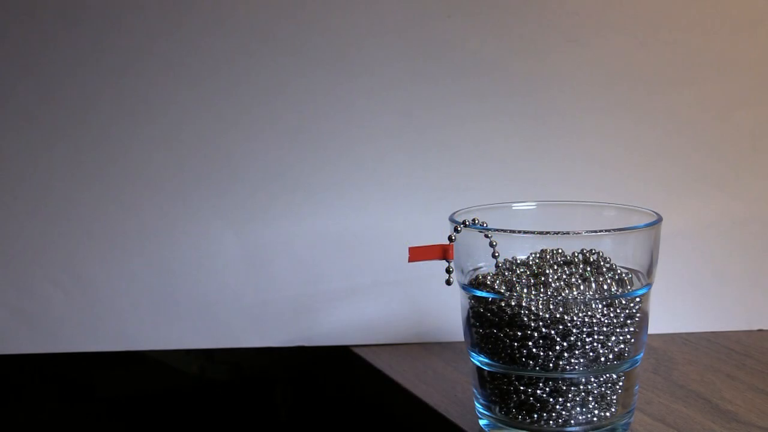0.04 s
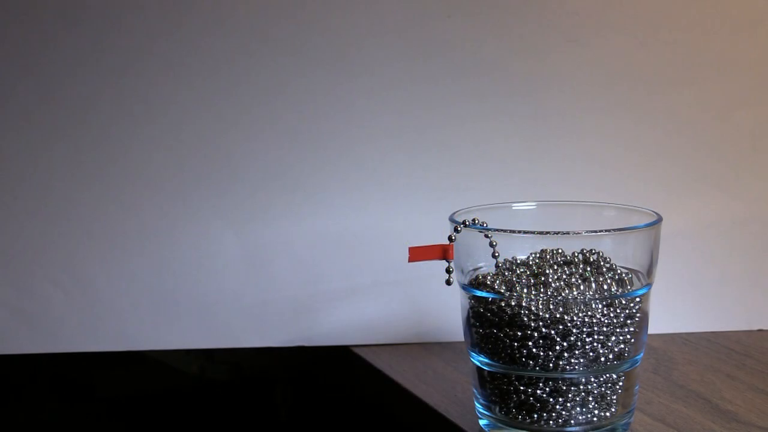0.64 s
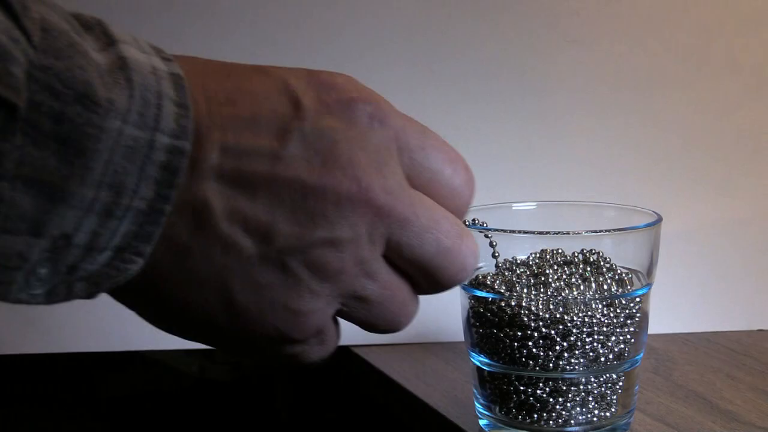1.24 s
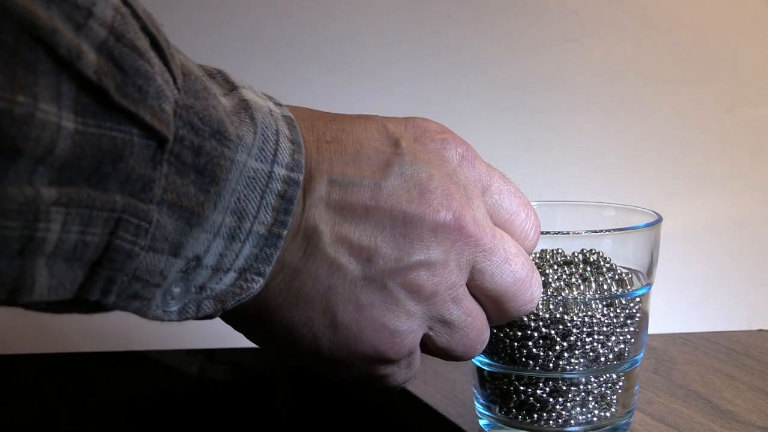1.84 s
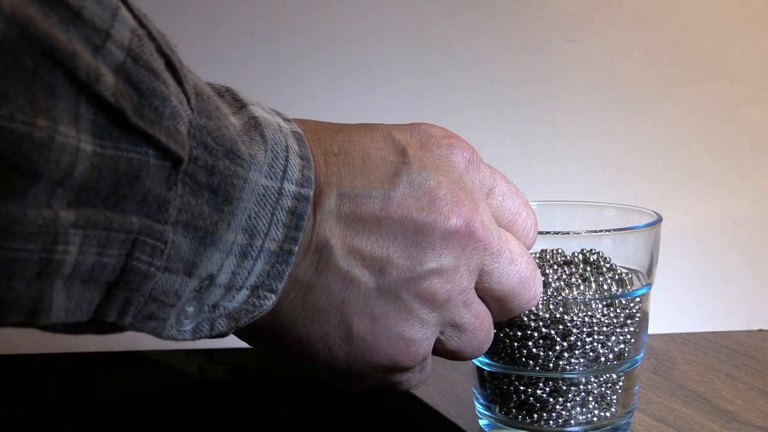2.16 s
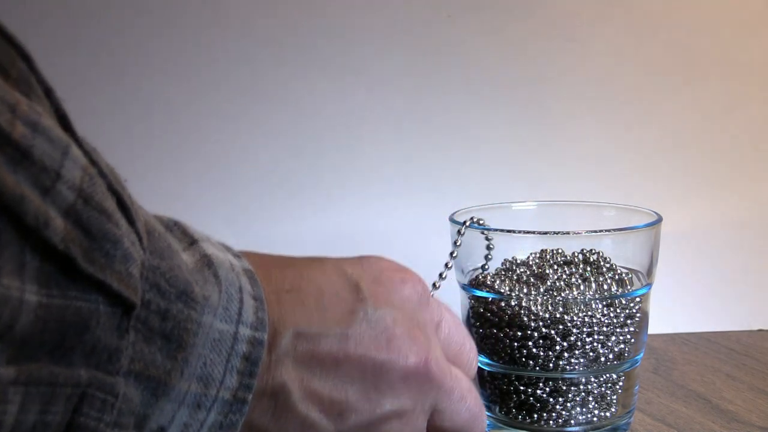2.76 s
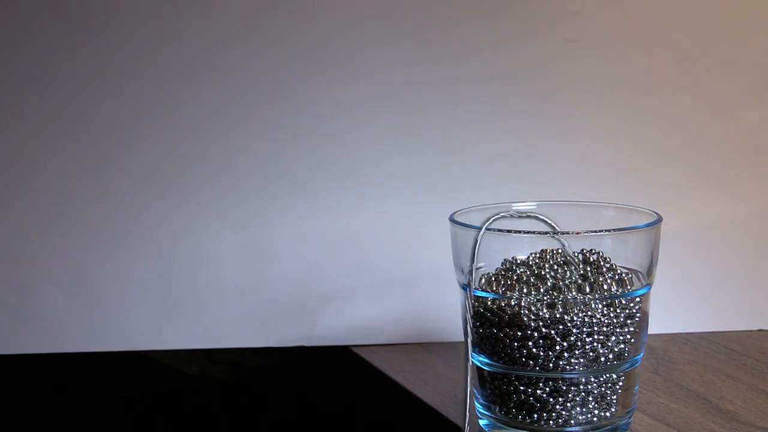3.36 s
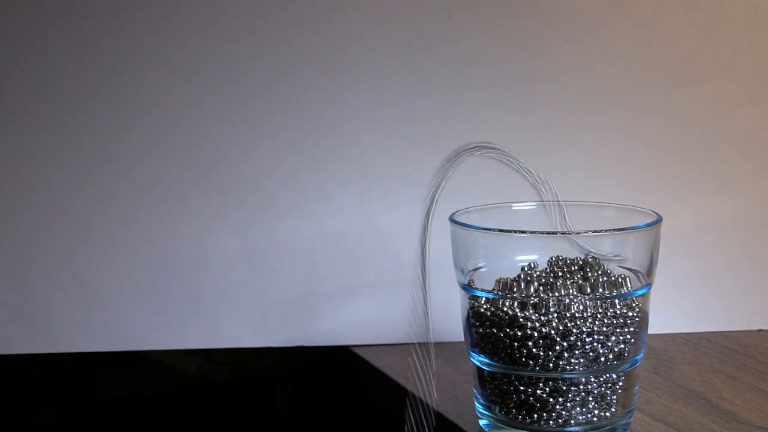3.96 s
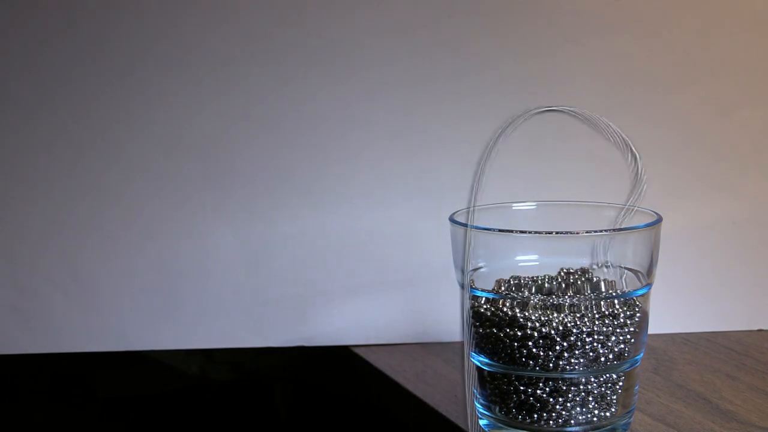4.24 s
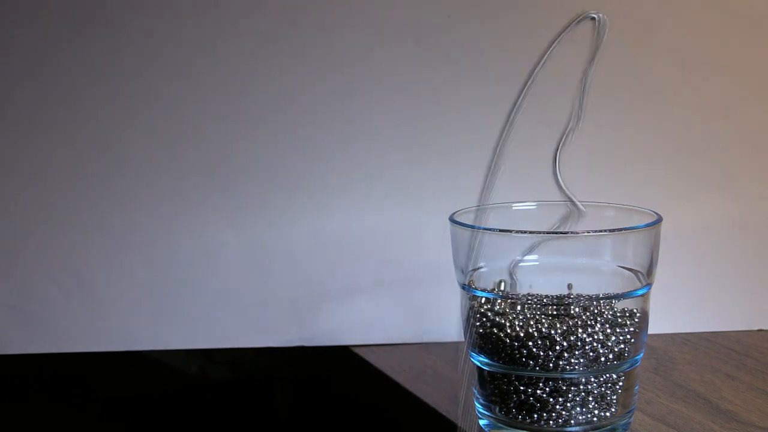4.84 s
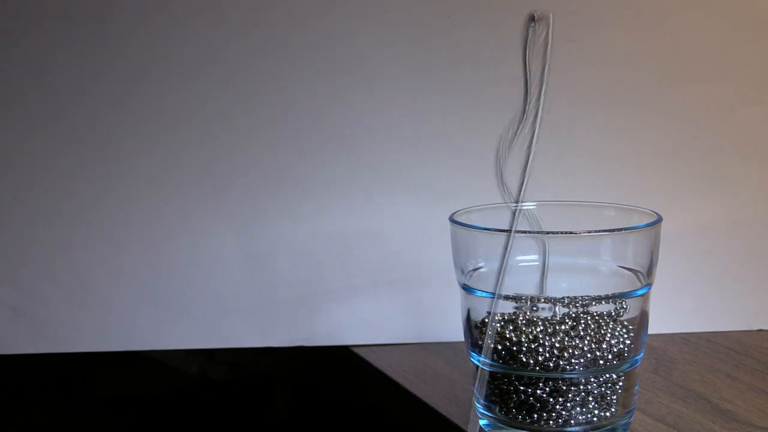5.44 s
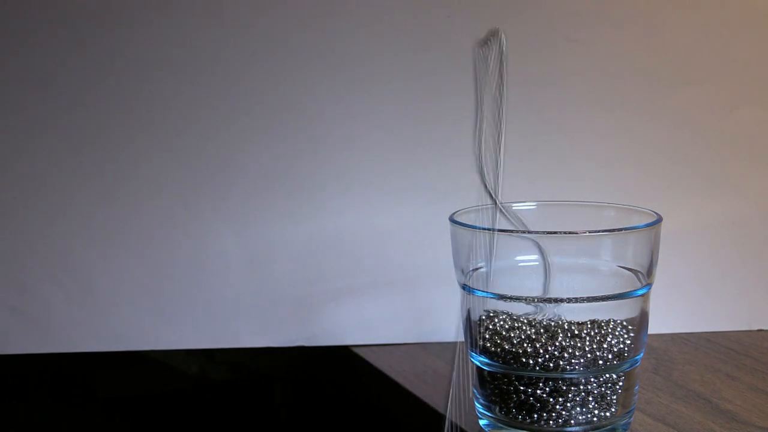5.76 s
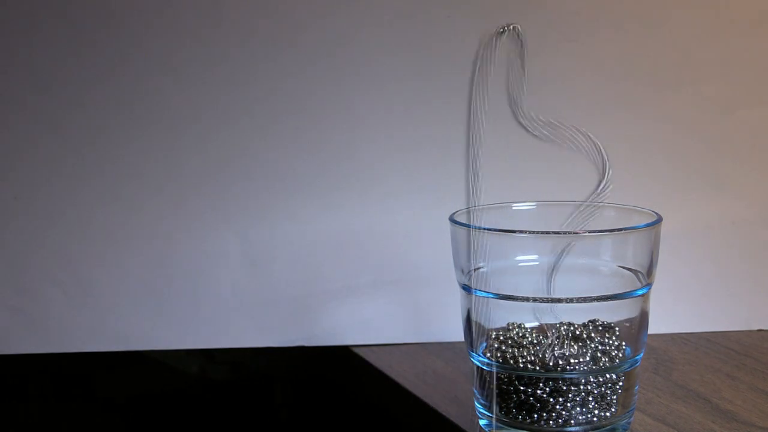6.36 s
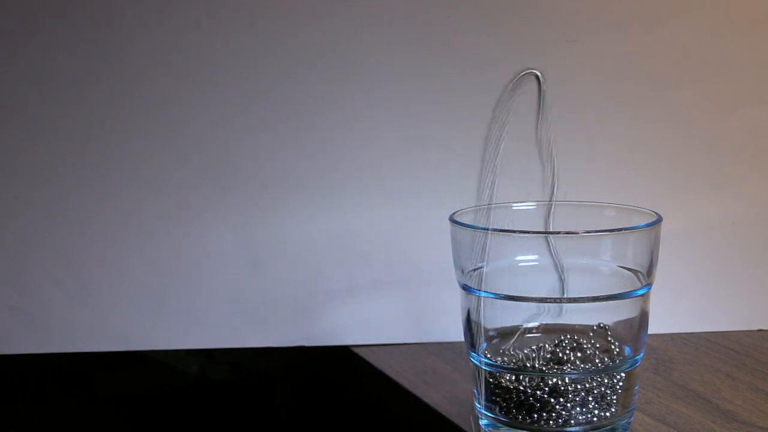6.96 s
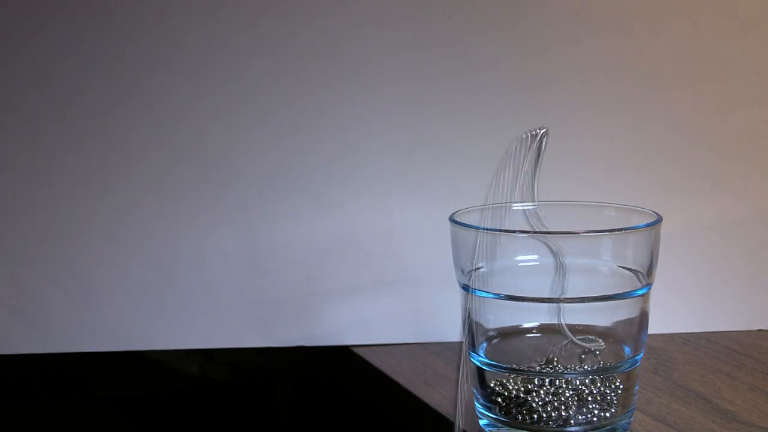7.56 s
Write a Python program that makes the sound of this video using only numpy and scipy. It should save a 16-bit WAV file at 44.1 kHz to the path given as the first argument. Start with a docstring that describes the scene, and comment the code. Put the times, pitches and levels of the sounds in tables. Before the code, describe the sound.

For the first two seconds there is only the faint hiss and hum of a small room, a few soft swishes, and a hand gently bumping the table at about 1.6 seconds. From 2.3 seconds a metal bead chain is drawn over the rim of a nearby drinking glass: sharp little ticks, a fine jingle and brief glassy rings, growing louder, with light knocks on the table edge and a low rumble from the unwinding pile. At about 3.9 seconds the running chain starts hitting a hard surface below and becomes a loud, bright clatter. It comes in uneven surges with sharp slaps, strongest from about 4 to 6.2 seconds, with occasional clinks from the glass. After about 6.7 seconds the surges and slaps are weaker, with thin, high ringing, and the rattle dies down at around 7.6 seconds.

```python
"""A metal bead chain siphons itself out of a drinking glass in a small, quiet room.
First come faint air, hum and swishes, and a hand bumps the table. From 2.3 s the chain is drawn over
the rim: beads tick and jingle, the glass rings, the unwinding pile rumbles through the table and beads
knock on its edge. From about 3.9 s the chain, let go and running in an arch, clatters on a hard
surface below in surges and slaps, which grow weaker after about 6.7 s."""
import sys
import numpy as np
from scipy import signal
from scipy.fft import rfft, irfft, next_fast_len
from scipy.io import wavfile
from scipy.ndimage import uniform_filter1d

SR = 44100
rng = np.random.default_rng(int(sys.argv[2]) if len(sys.argv) > 2 else 0)


def wav_record(signal):
    """Record a signal, one row per channel, as 16-bit PCM in the file named by sys.argv[1]."""
    frames = np.transpose(np.atleast_2d(signal))
    bounded = np.clip(frames, -1, 1)
    # unit amplitude maps onto the largest positive 16-bit level
    quanta = np.round(bounded * 32767).astype(np.int16)
    wavfile.write(sys.argv[1], SR, quanta)


N = 340011
TIME = np.arange(N) / SR
FFT_SIZE = next_fast_len(N + SR, True)
HZ = np.fft.rfftfreq(FFT_SIZE, 1 / SR)


def amp(db):
    """Turns decibels into a number to multiply a sound by."""
    return 10 ** (np.asarray(db) / 20)


def unit_rms(x):
    """Scales a signal so that its average strength (rms) is one."""
    return x / np.sqrt(np.mean(x ** 2) + 1e-20)


def curve_at(points, hz):
    """Joins (pitch, value) points with lines on a log pitch scale and looks up hz."""
    pitches, values = np.transpose(points)
    return np.interp(np.log(hz + 1), np.log(pitches + 1), values)


def follow(points):
    """Turns (time, level) points into a gain for every sample, silent before the first."""
    times, levels_db = np.transpose(points)
    return amp(np.interp(TIME, times, levels_db)) * (TIME >= times[0])


def swell(peak_s, half_s, t=TIME):
    """A smooth, bell-shaped rise and fall."""
    return np.exp(-.5 * ((t - peak_s) / half_s) ** 2)


def fading_tone(hz, t60, t):
    """One resonance: a pure tone that fades by 60 dB in its ring time, t60 seconds."""
    return np.sin(2 * np.pi * hz * t) * np.exp(-np.log(1000) * t / t60)


def add(mix, s, sound):
    """Adds a sound to the mix at s seconds."""
    part = mix[max(round(s * SR), 0):][:len(sound)]
    part += sound[:len(part)]


def causal(gain):
    """A filter spectrum shaped like gain that rings after a click, never before (minimum phase)."""
    cepstrum = irfft(np.log(np.maximum(gain / gain.max(), 1e-5)))
    half = len(cepstrum) // 2
    cepstrum[1:half] *= 2
    cepstrum[half + 1:] = 0
    response = np.exp(rfft(cepstrum))
    return response / np.sqrt(np.mean(abs(response) ** 2))


def drift(per_s):
    """A random wobble that changes course about per_s times a second."""
    knots = np.arange(0, TIME[-1] + 1, 1 / per_s)
    return unit_rms(np.interp(TIME, knots, rng.standard_normal(4096)[:len(knots)]))


def patter(per_s, spread_db, size=N):
    """Tiny hits at random times; most are small, a few large."""
    chance, force, side = rng.random((3, size))
    strength = amp(spread_db * np.minimum(-np.log(1 - force), 4))
    return (chance < per_s / SR) * strength * np.sign(side - .5)


def stereo_pair(a, b, likeness):
    """Makes left and right from two noises; a likeness of 1 makes both sides the same."""
    return np.array([a, likeness * a + np.sqrt(1 - likeness ** 2) * b])


def noise(colour, likeness):
    """Stereo noise whose colour (its balance of low and high) follows (pitch, level) points."""
    a, b = rfft(rng.standard_normal((2, FFT_SIZE)))
    return unit_rms(irfft(stereo_pair(a, b, likeness) * amp(curve_at(colour, HZ)))[:, :N])


def hum():
    """Two faint tones that waver slightly."""
    # (pitch [Hz], level [dB])
    tones = [(301, -68.5), (1238, -76.5)]
    out = 0
    for hz, db in tones:
        phase = 2 * np.pi * (hz * TIME + rng.random()) + .5 * drift(5.17)
        out += amp(db) * np.sqrt(2) * np.sin(phase)
    return out


def room_air(level_db=-58):
    """The soft, steady hiss of the room."""
    # colour of the air (pitch [Hz], level [dB])
    colour = [(15, -47), (25, -24), (108, -14), (137, -10.5), (180, -5.5), (263, -11), (301, -7),
              (416, -9.5), (516, -9.5), (1130, -11), (1260, -13), (1370, -14), (3340, -20.5), (16000, -34)]
    # how alike the two sides are (pitch [Hz], likeness [-1 to 1])
    likeness = [(60, 0.51), (180, 0.91), (550, -0.21), (1650, -0.27), (4970, 0.59), (15000, 0.45)]
    return amp(level_db) * noise(colour, curve_at(likeness, HZ))


def swishes():
    """Faint puffs of noise, about one a second at the start."""
    # (time [s], level [dB], half length [s])
    puffs = [(0.023, -59, 0.11), (0.819, -53, 0.025), (0.894, -57.5, .03), (1.825, -54.5, 0.03),
             (2.828, -52, 0.03)]
    # colour of a swish (pitch [Hz], level [dB])
    colour = [(350, -45), (600, -16), (894, -8.5), (1230, -11), (2170, -7.5), (2810, -13), (9670, -21.5),
              (13000, -41)]
    return sum(amp(db) * swell(s, half_s) for s, db, half_s in puffs) * noise(colour, 0.51)


def table_bumps(rise_s=0.006):
    """The tabletop thuds when the hand, and later the running chain, bumps it."""
    # (time [s], level [dB])
    bumps = [(0.127, -51), (1.552, -42.5), (1.575, -36.5), (1.598, -39), (1.641, -42.5), (4.728, -40.5),
             (6.378, -34)]
    out, t = np.zeros(N), np.arange(SR // 5) / SR
    tones = sum(gain * np.sin(2 * np.pi * hz * t) for hz, gain in [(262, 1), (135, 0.24), (350, 0.31)])
    thud = 0.64 * tones * (t / rise_s) * np.exp(1 - t / rise_s)
    for s, db in bumps:
        add(out, s, amp(db) * thud)
    return out


def low_tone():
    """A low tone swells briefly."""
    # (time [s], pitch [Hz], level [dB], half length [s])
    tone = (.77, 184, -61, .055)
    s, hz, db, half_s = tone
    return amp(db) * np.sqrt(2) * np.sin(2 * np.pi * hz * TIME) * swell(s, half_s)


def link_fizz():
    """The tiny links between the beads rub as the chain bends: a fine, very high fizz."""
    # (time [s], level [dB])
    levels = [(2.3, -72), (3.2, -62), (3.8, -54), (7.7, -55)]
    treble = signal.butter(4, 10000, "high", fs=SR, output="sos")
    return unit_rms(signal.sosfilt(treble, patter(per_s=3000, spread_db=3))) * follow(levels)


def glass_ring(t60, group_db, rise_s=0.00035):
    """The glass rings after one blow; where it is hit sets the balance of low, middle and high tones."""
    # tones of the glass (pitch [Hz], level [dB], ring time [share of the longest])
    tones = [(760, -20, .6), (1060, -18, .4), (2028, -7, .8), (4090, -8, .22), (4243, 0, .75),
             (4400, -11, .15), (6700, -9, .2), (6780, -6, .6), (6802, -2, 1.0), (9900, -10, .2),
             (10060, -2, .7), (10110, -6, .5), (10230, -9, .8), (12955, -24, .7), (13935, -14, .7),
             (13975, -13, .7)]
    # borders between the groups of tones (low to middle [Hz], middle to high [Hz])
    borders_hz = [5500, 8500]
    t = np.arange(SR // 3) / SR
    ring = 0
    for hz, db, share in tones:
        force_db = db + group_db[np.searchsorted(borders_hz, hz)] + rng.normal(0, 1)
        ring += amp(force_db) * fading_tone(hz, t60 * share, t)
    return ring * (1 - np.exp(-(t / rise_s) ** 2))


def pile_jingle(per_s=200, spread_db=3.5, click_db=-6, spots=4):
    """Beads leaving the pile click together and graze the glass, too softly to wake its top tones."""
    # (time [s], level [dB])
    levels = [(2.3, -68), (2.8, -53.5), (3.45, -53.5), (3.7, -42), (4.0, -33.5), (7.0, -53), (7.4, -42),
              (7.7, -55)]
    out = np.zeros(N)
    click_band = signal.butter(2, [1500, 9000], "band", fs=SR, output="sos")
    soften = signal.butter(4, 11500, fs=SR, output="sos")
    for _ in range(spots):
        ring = signal.sosfilt(soften, glass_ring(t60=0.016, group_db=[-5, -9, 0]))
        out += unit_rms(signal.oaconvolve(patter(per_s / spots, spread_db), ring)[:N])
        out += amp(click_db) * unit_rms(signal.sosfilt(click_band, patter(per_s, spread_db)))
    return unit_rms(out) * follow(levels)


def rim_ticks(ring_db=7, tick_s=0.00028):
    """Each bead that hits the rim gives a sharp tick and sets the glass ringing."""
    # (time [s], level [dB], middle tone boost [dB], high tone boost [dB])
    strikes = [(2.3386, -47.5, 0, 5), (2.411, -47.5, 0, 1), (2.468, -48.5, 5, 7), (2.5309, -45.5, 3, -5),
               (2.5712, -45.5, 5, 10), (2.6493, -44.5, -17, 5.5), (2.7128, -51, 2, 8),
               (2.7474, -43.5, -17, 3.5), (2.7914, -50, 5, 9), (2.819, -47, 4, 5), (2.8402, -44, -9, 3.5),
               (2.8842, -46, -15, 2), (2.913, -44, -15, 7), (2.951, -42.5, -11, -7), (2.988, -44, -9, -2),
               (3.01, -47.5, -5, 5), (3.039, -45, -9, 2), (3.1178, -48.5, 0, 4), (3.1663, -42, 1, -2),
               (3.1943, -51, 0, 8), (3.2166, -43, -8, 3), (3.299, -45, 0, 11), (3.342, -44, 2, 1),
               (3.3508, -43, -9, 4), (3.3787, -50.5, -5, 12), (3.4035, -45.5, 6, 7.5),
               (3.439, -48.5, -1, 9), (3.512, -39, 9, 6.5), (3.5854, -42.5, -14, 11.5),
               (3.6295, -40.5, -2, 7.5), (3.667, -38, -3, -3), (3.682, -46, 8, 6), (3.7145, -37, 1.5, 3),
               (3.7621, -27.5, -2, -7), (3.7866, -33, 8, 5), (3.8142, -38, -10, 12), (3.8384, -40.5, 15, 7),
               (3.85, -32.5, 6, 5.5), (3.931, -25, 1.5, 1), (3.953, -37, 5, 13.5), (4.371, -36, 10, 14.5),
               (4.3954, -32, 8, 3), (4.4234, -30.5, 5, -1), (4.8944, -35.5, 4, -7), (6.4852, -41, -6, -5),
               (7.0297, -29.5, 3.5, 0.5), (7.0386, -32, 11.5, -3), (7.0583, -43.5, 14, -12),
               (7.4226, -54, -18, 5), (7.505, -50, -11, -4)]
    # the glass rings short while a hand still holds it, longer later (time [s], ring time [s])
    ring_times = [(2.3, 0.027), (3.2, 0.039), (3.5, 0.065), (4.0, 0.093), (4.9, 0.44), (7.0, 0.2)]
    # ticks soften once the chain only grazes the rim (time [s], tick boost [dB])
    tick_boosts = [(2.3, 23.5), (4.4, 10.5), (6.5, 8)]
    out, t = np.zeros(N), np.arange(SR // 100) / SR
    band = signal.butter(3, [3600, 9500], "band", fs=SR, output="sos")
    for s, db, middle_db, high_db in strikes:
        tick = signal.sosfilt(band, rng.standard_normal(len(t)) * np.exp(-t / tick_s))
        tick_db = np.interp(s, *np.transpose(tick_boosts))
        t60 = np.interp(s, *np.transpose(ring_times))
        add(out, s, amp(db + tick_db) * tick / np.linalg.norm(tick))
        add(out, s, amp(db + ring_db) * glass_ring(t60, [0, middle_db, high_db]))
    return out


def room_tail(build_s, likeness):
    """The room's many echoes blur into a tail; middle pitches last longest."""
    # (pitch [Hz], ring time [s])
    ring_times = [(300, 0.12), (2000, 0.6), (6000, 0.3), (14000, 0.11)]
    a, b = rng.standard_normal((2, SR // 2))
    hz, t, spectra = signal.stft(stereo_pair(a, b, likeness), SR, nperseg=256)
    fade = np.exp(-np.log(1000) * t / curve_at(ring_times, hz)[:, None])
    spectra *= fade * (1 - np.exp(-t / build_s))
    tail = signal.istft(spectra, SR, nperseg=256)[1][:, :SR // 2]
    return tail / np.linalg.norm(tail[0])


def from_glass(sound, room_db=-5, level_db=-3):
    """Carries a sound from the glass to the ears: directly, as three close echoes and through the room."""
    # echoes off the wall and table (delay [s], left level [dB], right level [dB])
    echoes = [(.0027, -10, 0.5), (.0088, -43, -27.5), (0.0123, -11, -2.5)]
    path = amp(room_db) * room_tail(build_s=0.0013, likeness=0.24)
    path[:, 0] += 1  # the direct sound
    for s, left_db, right_db in echoes:
        path[:, round(s * SR)] += amp([left_db, right_db])
    return amp(level_db) * signal.oaconvolve(sound[None], path, axes=1)[:, :N]


def glass_rocking(level_db=-60):
    """While the chain still rubs the rim, it rocks the glass on the table: a low murmur."""
    # (pitch [Hz], level [dB])
    colour = [(60, -44), (105, 13), (130, 11), (180, -10), (600, -45), (2000, -80)]
    return amp(level_db) * noise(colour, 0.99) * swell(peak_s=3.6, half_s=0.4)


def pile_rumble(level_db=-1, jolt_half_s=0.022):
    """The unwinding pile drags on the glass and rumbles through the table."""
    # the rumble grows until the chain runs at full speed (time [s], level [dB])
    levels = [(2.7, -77), (3.1, -65), (3.25, -58), (3.95, -50), (7.7, -48)]
    # colour of the rumble (pitch [Hz], level [dB])
    colour = [(40, -44), (85, -29.5), (122, -2), (160, -12), (230, 6), (310, -11.5), (380, 1), (460, 1.5),
              (580, -9), (850, -8), (1400, -18.5), (2100, -10.5), (3200, -14.5), (9000, -23)]
    # snags in the pile jolt the glass (time [s], boost [dB])
    jolts = [(3.96, 7), (5.25, 4.5), (5.5, 5), (7.045, 8)]
    jolts_db = sum(db * swell(s, jolt_half_s) for s, db in jolts)
    return amp(level_db + jolts_db) * noise(colour, 0.99) * follow(levels)


def edge_knocks(rise_s=0.0035):
    """Beads bump the wooden edge of the table on their way down."""
    # (time [s], level [dB])
    levels = [(2.9, -71), (3.5, -52.5), (4.1, -42), (4.6, -72), (7.7, -59)]
    # tones of the table edge (pitch [Hz], level [dB], ring time [s])
    tones = [(610, 5, 0.041), (718, -4.5, 0.098), (848, 7, 0.036), (1055, 1.5, 0.033), (1280, 6, 0.019),
             (1580, -2, 0.025)]
    t = np.arange(SR // 8) / SR
    ring = sum(amp(db) * fading_tone(hz, t60, t) for hz, db, t60 in tones)
    knock = np.diff(ring * (1 - np.exp(-t / rise_s)), prepend=0)
    hits = patter(per_s=150, spread_db=6)
    return unit_rms(signal.oaconvolve(hits, knock)[:N]) * follow(levels)


def from_below(sound, room_db, near_db, near_s, likeness):
    """Carries a sound up from a landing spot: directly, off nearby furniture and through the room."""
    t = np.arange(SR // 2) / SR
    shared, left, right = rng.standard_normal((3, len(t)))
    near = (shared + 1.46 * np.array([left, right])) * np.exp(-t / near_s)
    path = amp(room_db) * room_tail(0.012, likeness) + amp(near_db) * near / np.linalg.norm(near[0])
    path[:, 0] += 1  # the direct sound
    return signal.fftconvolve(sound[None], path / np.linalg.norm(path[0]), axes=1)


def surface_gain(narrowest_hz=25, bass_cut_hz=250):
    """How strongly each pitch sounds when the chain hits the surface; light beads make no bass."""
    # colour of the landing chain (pitch [Hz], level [dB])
    colour = [(400, -18.5), (600, -30), (700, -19), (900, -5), (1250, 2.5), (1800, 5), (2400, 6),
              (3000, 0.5), (3700, -3.5), (5200, -8), (7000, -6), (9800, -12), (11500, -17), (15000, -26.5)]
    # resonances of the surface (pitch [Hz], width [Hz], boost [dB])
    peaks = [(705, 83, 8.5), (676, 21, -2.5), (837, 24, -2), (964, 20, 5.5), (1232, 23.5, 10),
             (1363, 33, 6), (1429, 32, 2), (1495, 10, 3), (1630, 23, -2), (1743, 35, 7), (1860, 28, -6),
             (1880, 30, 8.5), (2249, 36, 6), (2400, 140, 3.5), (2863, 23, 6), (2720, 39, 10.5),
             (3057, 90, 7), (3460, 38, 9), (4140, 260, 1.5), (5340, 150, 1.5)]
    peaks_db = sum(db / (1 + (2 * (HZ - hz) / max(width, narrowest_hz)) ** 2) for hz, width, db in peaks)
    return amp(curve_at(colour, HZ) + peaks_db) * HZ ** 2 / (HZ ** 2 + bass_cut_hz ** 2)


def surge_forces(knock_db=3.5, knock_share=0.55):
    """Each surge of chain rises, holds and fades; heavy ones thud and knock, light ones clack and sizzle."""
    # (peak time [s], level [dB], rise [s], hold [s], weight or thud boost [dB], sizzle boost [dB])
    surges = [(3.866, -29, .019, 0.21, -12, -4), (4.035, -28.5, 0.024, 0.024, -0.5, 10),
              (4.181, -20, 0.014, 0.025, -0.5, 2.5), (4.292, -19, 0.057, 0.13, -11, -2.5),
              (4.476, -20, 0.051, 0.1, -13.5, -2), (4.63, -21.5, 0.12, 0.13, -6, -2),
              (4.957, -18.5, .012, 0.02, -15, 0.5), (5.163, -21, 0.023, 0.011, -9, -5.5),
              (5.225, -27, 0.017, 0.08, -30, 6), (5.38, -23, 0.054, 0.074, -11, -8),
              (5.521, -20, 0.066, 0.042, -13.5, -0.5), (5.704, -21, 0.017, 0.062, -4, 0),
              (5.875, -25, 0.1, 0.11, -7.5, -5.5), (6.027, -23, .006, .004, -9.5, 2.5),
              (6.124, -22.5, .01, 0.13, -10.5, -5), (6.472, -33.5, 0.04, .11, -5, -7),
              (6.652, -25, 0.071, 0.048, -13.5, 0.5), (6.9, -41.5, 0.024, 0.011, -4, 0),
              (7.07, -36.5, 0.038, 0.094, -14, 5), (7.317, -37.5, .008, 0.02, -7.5, 4),
              (7.575, -51.5, .012, .01, 9.5, 10.5)]
    # how fast a surge fades (thuds [dB/s], knocks [dB/s], clacks [dB/s], sizzle [dB/s])
    fade_rates = [93, 55, 72, 84]
    power = np.zeros((len(fade_rates), N))
    for s, db, rise_s, hold_s, weight_db, sizzle_db in surges:
        t = np.arange(SR) / SR - rise_s
        rise = np.minimum(1 + t / rise_s, 1)
        fading_s = np.maximum(t - hold_s, 0)
        levels = db + np.array([weight_db, knock_db + knock_share * weight_db, 0, sizzle_db])
        for band, level, rate in zip(power, levels, fade_rates):
            add(band, s - rise_s, (rise * amp(level - rate * fading_s)) ** 2)
    return np.sqrt(power)


def spot_colour(ripple_db=3.8, spacing_hz=170, size=2048):
    """A short random ring: every spot of the heap and the surface favours its own pitches."""
    hz = np.fft.rfftfreq(size, 1 / SR)
    knots = np.arange(512) * spacing_hz
    ripple = np.interp(hz, knots, rng.standard_normal(len(knots)))
    return irfft(causal(amp(ripple_db * ripple)))


def landing_clatter(wander_db=9, clump_db=2, spots=10):
    """Beads rain on several spots; slow, heavy hits sound low and brief, hard ones high."""
    # borders around the thud, knock, clack and sizzle bands (pitch [Hz])
    borders_hz = [560, 1050, 2000, 3800, 15000]
    surface = surface_gain()
    bands = [causal(surface / np.sqrt((1 + (low / (HZ + 1)) ** 10) * (1 + (HZ / high) ** 10)))
             for low, high in zip(borders_hz, borders_hz[1:])]
    clumps = unit_rms(amp(clump_db * drift(90)))  # the chain arrives in small folds
    forces = surge_forces() * clumps
    shares = amp(wander_db * np.array([drift(14) for _ in range(spots)]))  # its foot wanders about
    shares /= np.linalg.norm(shares, axis=0)
    spectrum = 0
    for share in shares:
        hits = share * unit_rms(patter(per_s=1100, spread_db=2.5))
        struck = sum(rfft(hits * force, FFT_SIZE) * band for force, band in zip(forces, bands))
        path = from_below(spot_colour(), room_db=-4.5, near_db=3.5, near_s=0.018, likeness=0.48)
        spectrum += struck * rfft(path, FFT_SIZE)
    return irfft(spectrum)[:, :N]


def loop_slaps(shower_db=-12, shower_s=0.012, knock_db=2, ring_db=12, ring_octaves=0.17):
    """A loop lands with one hard knock and a quick shower of the beads behind it; the spot rings."""
    # (time [s], level [dB], ring pitch [Hz], treble [dB], first knock [dB])
    slaps = [(3.864, -9, 2120, -3, -9), (4.001, -8, 2380, 14, -14), (4.042, -7, 2390, 9, -2),
             (4.068, -4, 2300, 7, -5), (4.137, -6, 2270, 3.5, -11), (4.194, -4.5, 1170, 8, -7),
             (4.32, -5.5, 3030, -18, -17), (4.488, -8.5, 3200, 9, -2), (4.524, -7, 3080, 4, -22),
             (4.605, -8.5, 2400, -46, -9), (4.761, -11, 1690, -12, -1), (4.962, -11.5, 3200, 0, 3),
             (5.212, -12, 1840, 3, 0), (5.23, -4.5, 2860, 12, 1), (5.462, -10.5, 1980, -6, 1.5),
             (5.524, -7.5, 1450, 2, -16), (5.7, -16, 2600, -17, 7), (5.722, -13.5, 1320, 0, 9.5),
             (5.759, -12, 1280, 2, 4), (6.022, -1.5, 1160, 2, -6), (6.109, -6, 1980, 2, 4.5),
             (6.682, -14, 1550, -2, 6.5), (6.919, -22.5, 1260, -11, 5), (7.084, -15.5, 1490, 9, -8),
             (7.151, -15, 2260, 5.5, -7), (7.17, -15.5, 2330, 11, -18), (7.258, -11, 2960, -2, 1),
             (7.322, -14.5, 2920, 12, -2), (7.562, -23.5, 1320, -26, -12), (7.592, -24.5, 1570, -7, 7.5)]
    out, t = np.zeros((2, N)), np.arange(SR // 5) / SR
    hz = np.fft.rfftfreq(len(t), 1 / SR) + 1
    surface = np.interp(hz, HZ, surface_gain())
    for s, db, ring_hz, treble_db, first_db in slaps:
        colour = surface * amp((treble_db + 6.5) / (1 + (3800 / hz) ** 4))
        ringing = colour * amp(ring_db / (1 + (np.log2(hz / ring_hz) / ring_octaves) ** 2))
        hits = patter(per_s=2500, spread_db=1, size=len(t)) * np.exp(-t / shower_s)
        beads = irfft(rfft(hits) * causal(ringing))
        shower = from_below(beads, room_db=-5.5, near_db=1.5, near_s=0.012, likeness=1)
        shower /= np.sqrt(np.mean(shower[:, :SR // 50] ** 2))
        knock = from_below(irfft(causal(colour)), room_db=-4.5, near_db=-5, near_s=0.0017, likeness=.5)
        knock /= abs(knock).max()
        for channel, sound in zip(out, amp(shower_db) * shower + amp(knock_db + first_db) * knock):
            add(channel, s, amp(db) * sound)
    return out


def spot_rings(half_s=.028, t60=.07):
    """Beads raining on one spot of the surface or glass feed a single tone, which swells and fades."""
    # (loudest time [s], pitch [Hz], level [dB])
    rings = [(4.07, 4340, -27), (4.09, 4134, -36), (4.2, 3470, -26.5), (4.22, 1192, -24),
             (4.281, 2880, -23.5), (4.348, 1412, -27), (4.35, 5680, -28), (4.5, 4091, -27),
             (4.711, 1329, -23), (5.01, 2366, -24.5), (5.031, 4500, -32), (5.27, 2756, -27.5),
             (5.55, 1488, -29), (5.81, 2420, -24), (6.16, 2450, -25), (6.2, 1248, -26), (6.28, 1244, -31.5),
             (7.226, 10200, -38), (7.28, 5211, -35), (7.336, 10340, -39), (7.36, 5211, -37),
             (7.45, 10260, -42), (7.59, 10300, -47)]
    out, t = np.zeros((2, N)), np.arange(SR // 3) / SR
    for s, hz, db in rings:
        hits = patter(per_s=1500, spread_db=1.5, size=len(t)) * swell(t[-1] / 2, half_s, t)
        tone = np.diff(fading_tone(hz, t60, t), 2, prepend=[0, 0])  # takes out the bass
        ring = from_below(signal.fftconvolve(hits, tone), room_db=-5, near_db=-6, near_s=.004, likeness=.7)
        power = uniform_filter1d((ring ** 2).mean(0), SR // 25)
        for channel, sound in zip(out, ring / np.sqrt(power.max())):
            add(channel, s - power.argmax() / SR, amp(db) * sound)
    return out


def lean_left(sound, db):
    """Turns the left side up and the right side down by db."""
    return sound * amp([[db], [-db]])


def scene():
    """Mixes the glass, the chain landing below, the table and the room, all a little to the left."""
    glass = from_glass(rim_ticks() + pile_jingle() + link_fizz() + edge_knocks())
    below = landing_clatter() + loop_slaps() + spot_rings()
    table = table_bumps() + glass_rocking() + pile_rumble()
    room = hum() + room_air() + swishes() + low_tone()
    return lean_left(glass, .4) + lean_left(below, .6) + lean_left(table, 1) + lean_left(room, .5)


def record(dry, cutoff_hz=15900):
    """The highest treble lifts a little, droops above that and is then cut off."""
    # (pitch [Hz], level [dB])
    treble = [(12500, 0), (14200, 2.5), (15500, -14)]
    shaped = irfft(rfft(dry, FFT_SIZE) * amp(curve_at(treble, HZ)))[:, :N]
    lowpass = signal.firwin(511, cutoff_hz, window=("kaiser", 9), fs=SR)
    return signal.oaconvolve(shaped, lowpass[None], "same")


dry = scene()
out = record(dry)
wav_record(out)
```